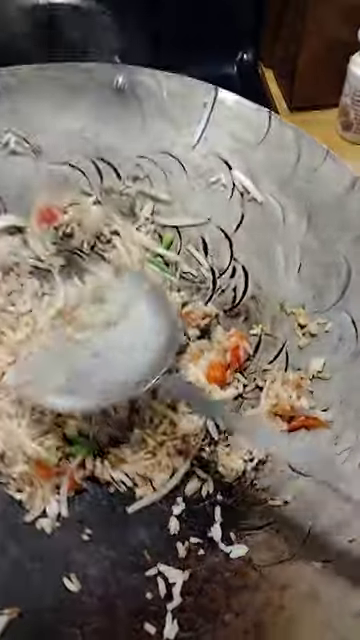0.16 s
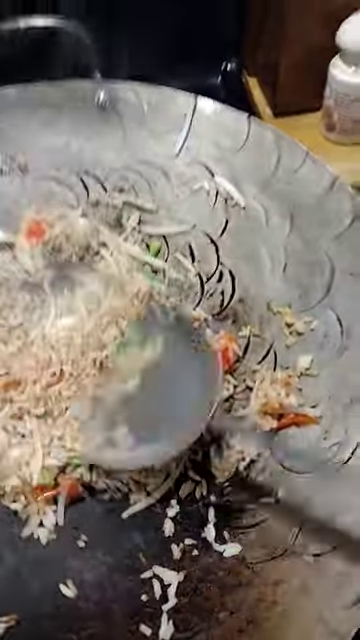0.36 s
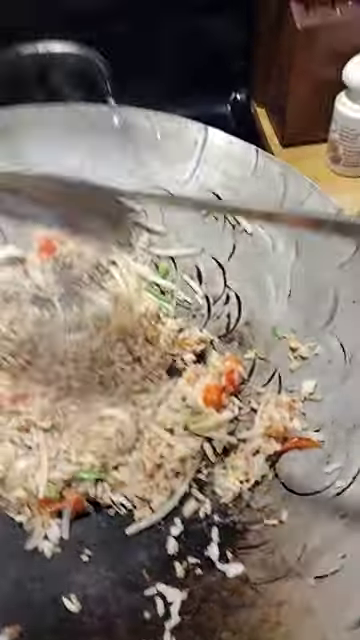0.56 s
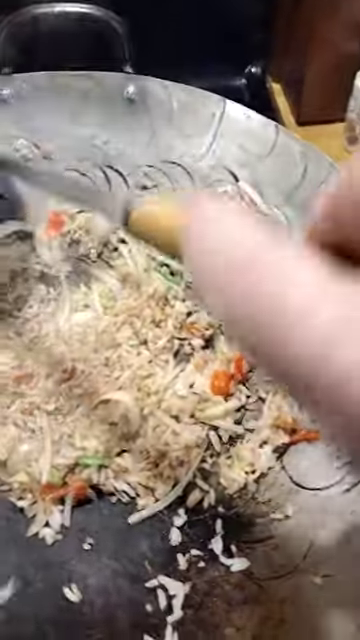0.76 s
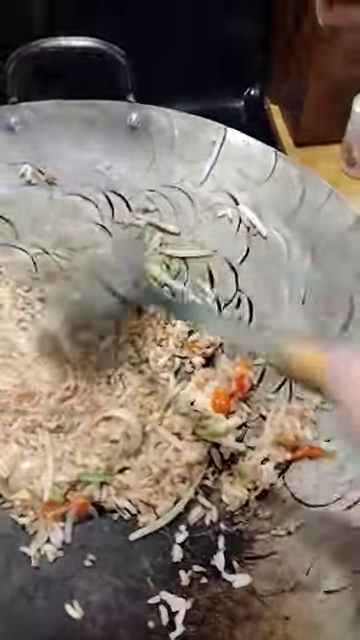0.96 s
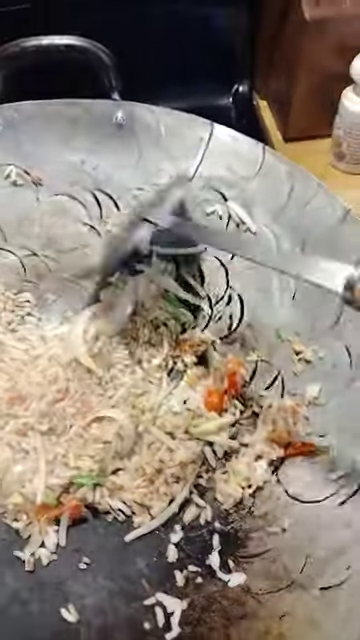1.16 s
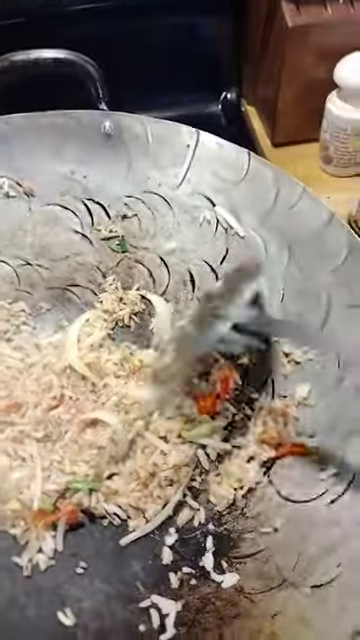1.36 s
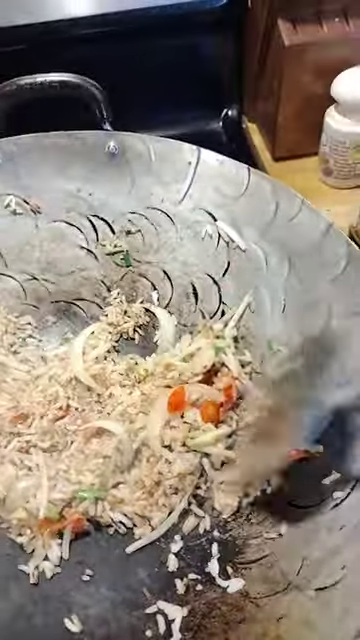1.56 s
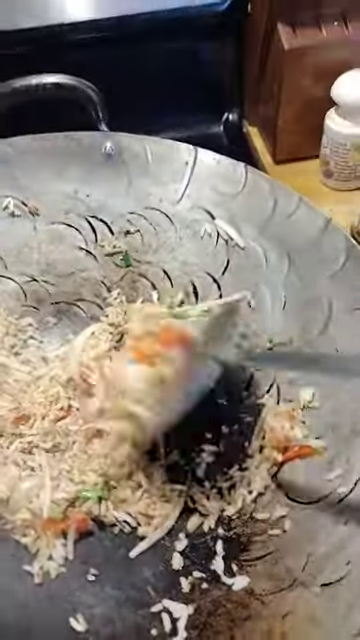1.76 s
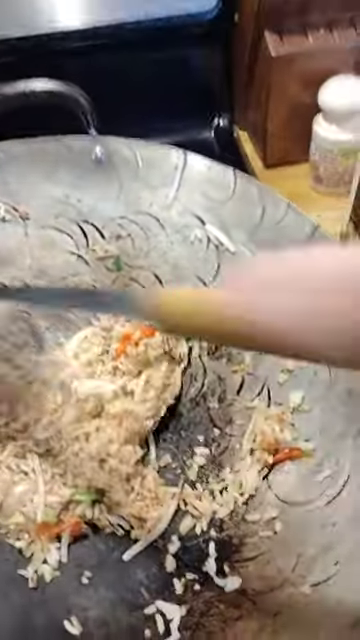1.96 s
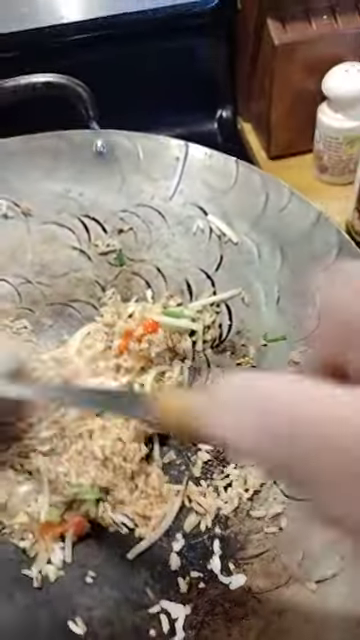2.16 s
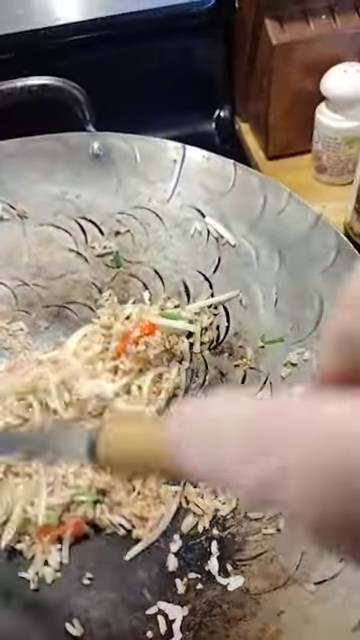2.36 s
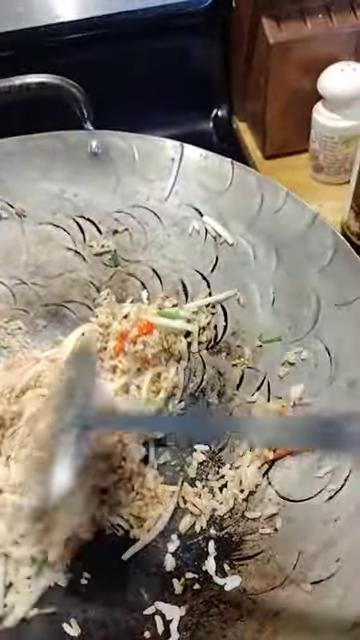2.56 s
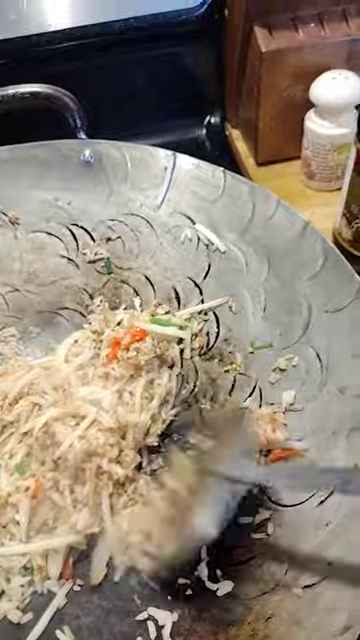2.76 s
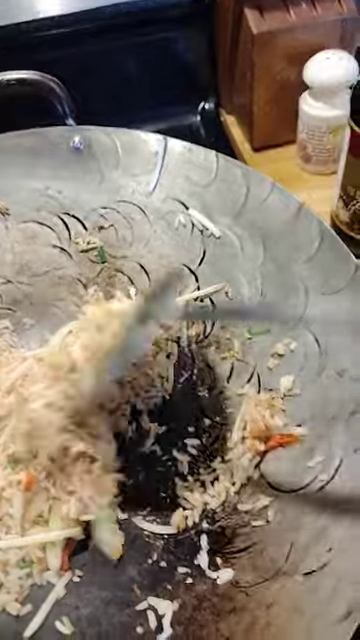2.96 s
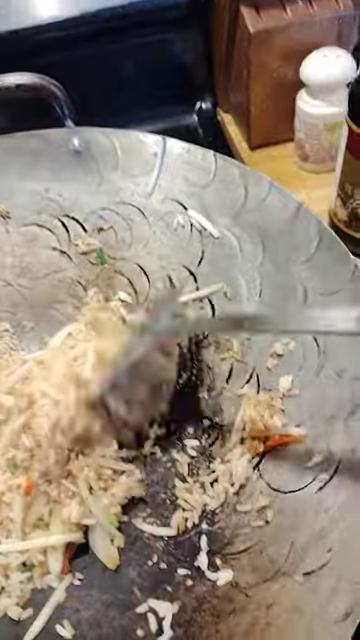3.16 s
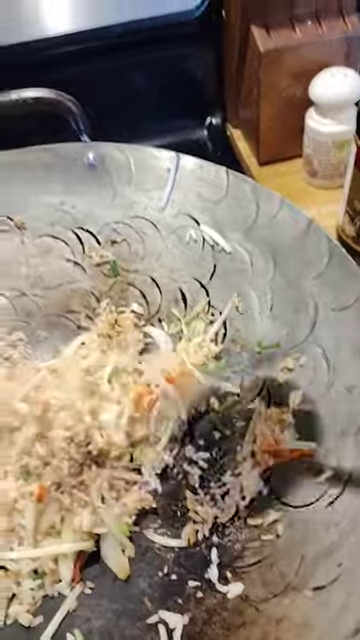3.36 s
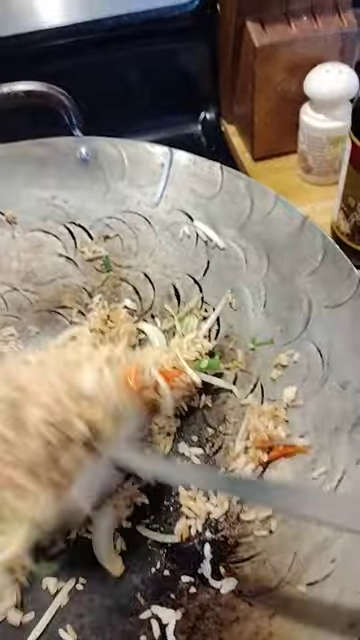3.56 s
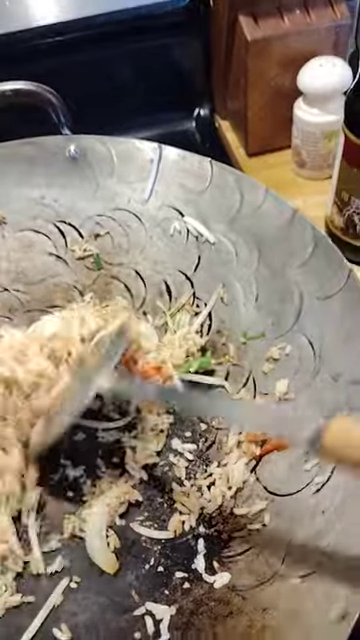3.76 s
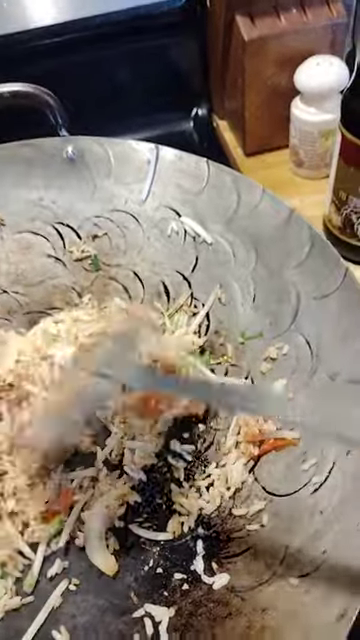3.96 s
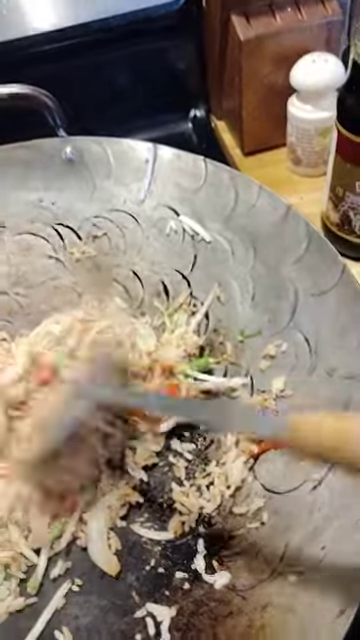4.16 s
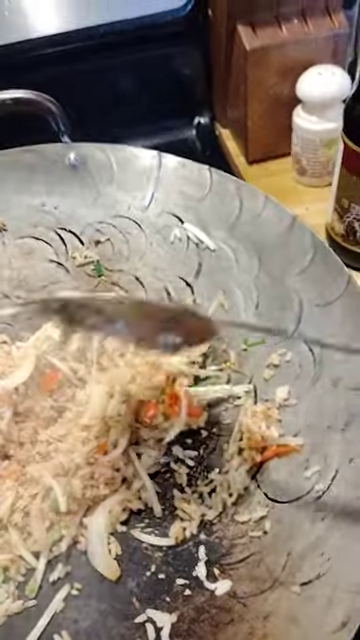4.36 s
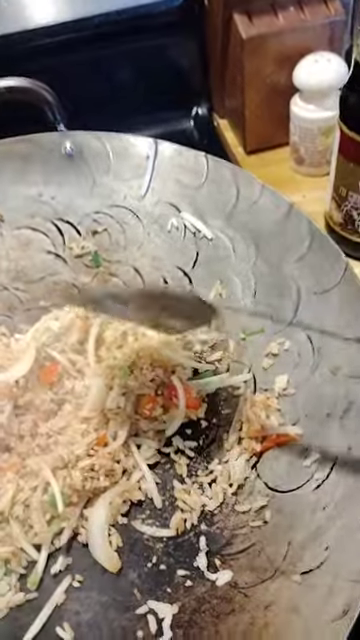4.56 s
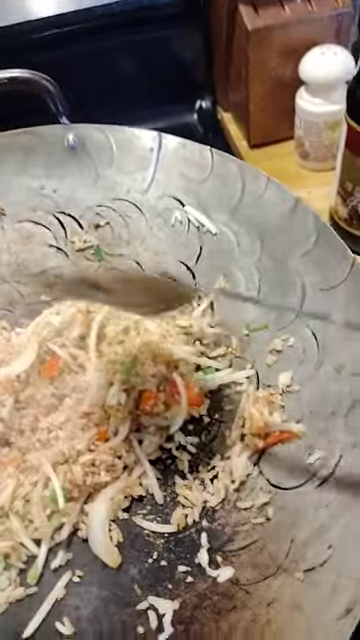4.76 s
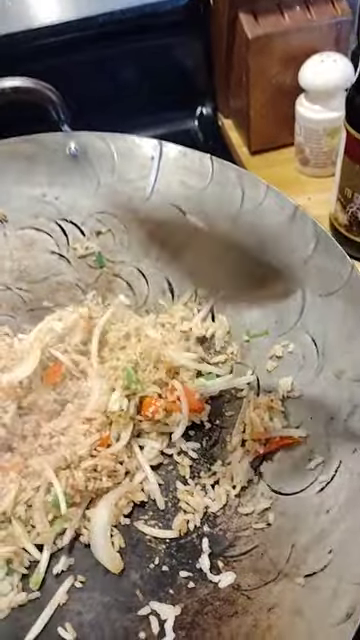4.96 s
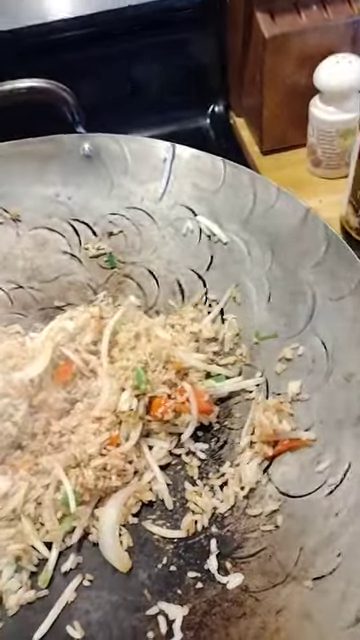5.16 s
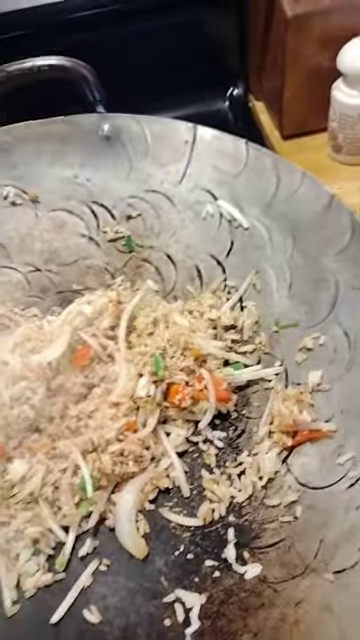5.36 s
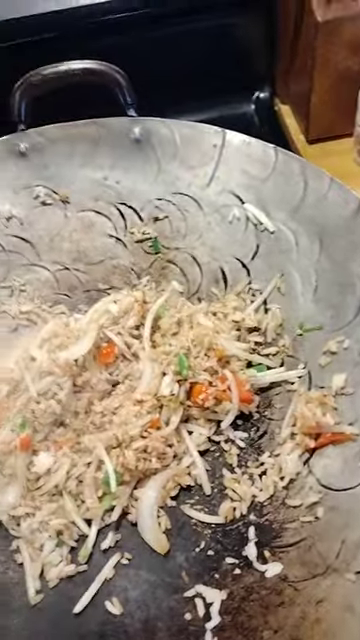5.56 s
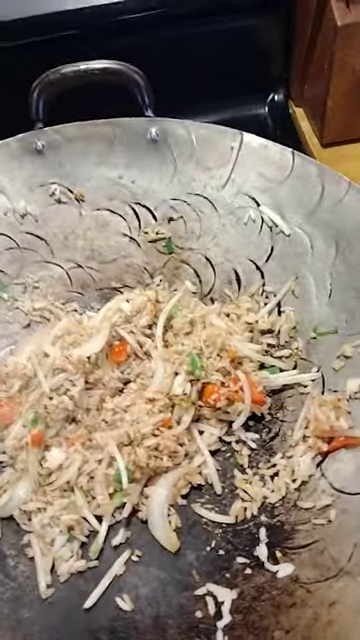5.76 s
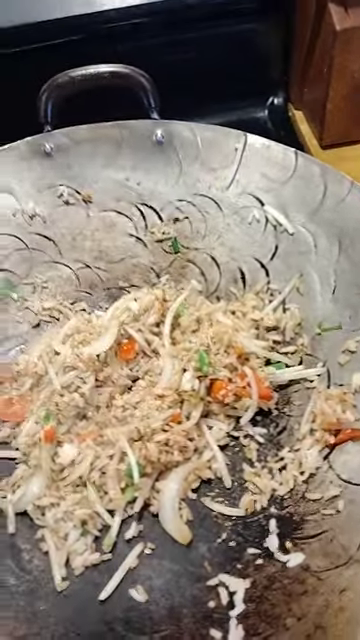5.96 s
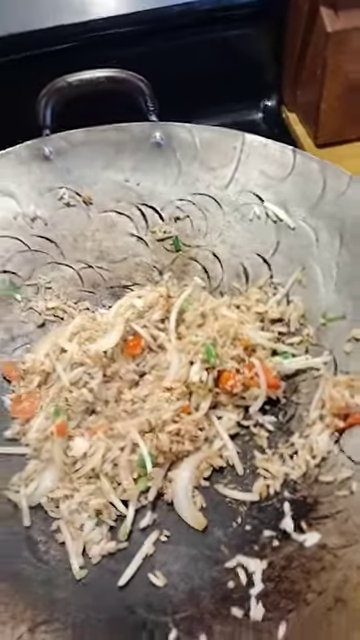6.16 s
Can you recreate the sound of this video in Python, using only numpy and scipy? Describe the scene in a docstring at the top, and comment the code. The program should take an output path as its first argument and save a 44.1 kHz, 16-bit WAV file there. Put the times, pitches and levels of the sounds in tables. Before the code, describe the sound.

Rice and vegetables crackle and sizzle in a steel wok while a metal spatula scrapes, clanks and rings, then a utensil clatters dully.

```python
"""A kitchen heard from close by, through a stereo microphone pair over a steel wok.
From the start rice and vegetables fry as crackling noise over the stove's low roar and wavering hum.
Soon a metal spatula scrapes (stick-slip noise through ringing modes), fat spits in short noise bursts,
and the spatula strikes the pan (pressure pulse, thud, ringing blade); turned rice flares up on hot steel.
The spatula is tapped off, the sizzle dies down, and near the end a utensil clatters dully on the worktop."""
import sys
import numpy as np
from scipy import signal
from scipy.fft import rfft, irfft, next_fast_len
from scipy.io import wavfile
from scipy.ndimage import uniform_filter1d

SR = 44100
rng = np.random.default_rng(int(sys.argv[2]) if len(sys.argv) > 2 else 0)


def unload_audio(sound):
    """Save the sound as a 16-bit wav file, at the path given as the first command line argument."""
    columns = np.transpose(np.atleast_2d(sound))
    # keep every value between -1 and 1, then stretch to whole-number steps
    steps = np.round(np.clip(columns, -1, 1) * 32767)
    wavfile.write(sys.argv[1], SR, steps.astype(np.int16))


N = 277827
TIME = np.arange(N) / SR  # s

# All table levels are relative: each source trims them further.
# Noise spectra of the frying food: (frequency [Hz], density [dB per Hz])
SIZZLE_SPECTRUM = [(30, -61), (300, -37), (700, -7.5), (1500, -18), (2100, 2.5), (3200, -1.5), (5000, 1.5),
                   (8000, 0), (12000, -3), (15500, -1.5)]
RUSTLE_SPECTRUM = [(30, -46), (250, -30.5), (500, -24.5), (900, -16.5), (1600, -10), (1900, -1), (2200, 1),
                   (2700, -5.5), (4000, -3), (6000, -18.5), (12000, -19)]
FIZZ_SPECTRUM = [(500, -46), (3000, -20), (7000, -4.5), (11000, 0.5), (15500, -1.5)]
# Noise spectra of the stove, wok, spatula blade and worktop: (frequency [Hz], density [dB per Hz])
STOVE_SPECTRUM = [(20, -57), (45, -25), (70, -7), (97, -7.5), (128, -6), (165, -5.5), (245, 1.5),
                  (330, -4.5), (450, -8), (700, -19), (1500, -19.5), (4000, -40), (12000, -34.5)]
WOK_SPECTRUM = [(40, -71), (100, -26), (200, -11), (400, -3), (900, 1), (1550, -10.5), (2200, 3),
                (2800, -30), (5000, -21), (12000, -26)]
BLADE_SPECTRUM = [(50, -88), (1000, -29), (3100, -12), (3550, 8.5), (4200, 1), (4900, -7.5), (6300, -3),
                  (8000, -10.5), (15500, -16.5)]
WORKTOP_SPECTRUM = [(30, -13), (130, -2), (330, -6), (450, 7.5), (750, 5.5), (1100, 6.5), (1500, -4),
                    (2300, -3.5), (3300, -19), (6000, -32), (15000, -44)]
# Likeness of the two microphone channels, held to 1 at most: (frequency [Hz], likeness [1 = identical])
CHANNEL_LIKENESS = [(60, 0.6), (290, 1.02), (640, 0.34), (1400, 0.48), (3100, 0.02), (6800, 0), (15000, 0)]
# Lean of the frying across the pair: (frequency [Hz], left minus right [dB])
FRY_LEAN = [(200, 21), (700, -8), (1300, -7), (2400, 7.5), (4400, -3.5), (8000, -5), (15000, -6.5)]
# Modes of the wok and of the spatula blade, before pitch and hold factors:
# (frequency [Hz], level [dB], 60 dB decay [s])
WOK_MODES = [(260, -15, 0.049), (441.4, 1.5, 0.12), (563, 1, 0.088), (643, 1, 0.1), (817, -3, 0.18),
             (928, 1, 0.086), (915, -2, 0.16), (1102, -11, 0.16), (1290, 2, 0.1), (1444, 3.5, 0.058),
             (1804, -2.5, 0.087), (1790, 9.5, 0.056), (2074, -16, 0.12), (2270, 7, 0.059)]
BLADE_MODES = [(2940, -10.5, 0.65), (3630, -2, 0.75), (3820, -4, 0.36), (3590, -5, 0.12),
               (3940, -0.5, 0.084), (4010, 5.5, 0.19), (4020, -22, .2), (4370, -16, 0.17),
               (4410, -7.5, 0.83), (5100, -1, 0.25), (5600, -1, 0.34), (6670, -5, .28), (6740, -23, 0.17),
               (6900, -20, 0.47), (7800, -22, 0.33), (9100, -12, 0.14)]
# Modes of the worktop, the utensil on it, a hollow thump and a small clink:
# (frequency [Hz], level [dB], 60 dB decay [s])
WORKTOP_MODES = [(146.5, -3, 0.2), (281, 0.5, 0.098), (433.3, 1, 0.2), (561, 4, 0.11), (750, -12, 0.067),
                 (950, -5, 0.039), (1100, -1.5, 0.061)]
UTENSIL_MODES = [(1120, -7, 0.015), (1490, -3, 0.018), (1674, -4.5, 0.037), (2180, 2.5, 0.014),
                 (3065, -13, 0.048)]
THUMP_MODES = [(158, -1, 0.18), (294, 1, 0.09), (470, -9, 0.064)]
CLINK_MODES = [(508, -4, 0.12), (745, 0, 0.078), (1750, -7, 0.062), (3040, -1, 0.05)]
# Rice turned onto hot steel: (peak time [s], rise [s], time to halve before the slow decay [s],
# sizzle level [dB], rustle level [dB])
RICE_TURNS = [(0.102, 0.041, 0.065, -16.5, -17.5), (.352, .018, 0.033, -23, -19.5),
              (.66, 0.034, 0.35, -33, -41.5), (.8, 0.036, 0.11, -36, -36.5),
              (1.061, 0.043, 0.056, -18, -26), (1.384, 0.024, 0.064, -21, -28),
              (1.77, 0.067, 0.58, -29, -40), (2.275, 0.045, 0.084, -22.5, -29.5), (2.6, 0.15, .4, -30, -35),
              (3.03, 0.25, 0.27, -32, -40.5), (3.32, 0.029, 0.062, -29, -37.5),
              (3.621, 0.013, 0.68, -23, -30.5), (3.92, 0.059, 0.43, -21, -27),
              (4.22, 0.034, 0.099, -20, -23.5), (5.09, 0.035, 0.12, -36, -39),
              (6.24, 0.022, 0.024, -58, -45.5)]
# Stove over time: (time [s], roar level [dB], hum level [dB])
STOVE_LEVELS = [(0, -45, -49.5), (2, -42.5, -49.5), (4.4, -45, -54.5), (4.9, -40, -39.5), (5.1, -36.5, -34),
                (5.4, -44, -41), (5.9, -40, -42), (6.3, -40.5, -44)]
# Blade scraping steel, and at 1.87 s a slow swell as the wok rings out: # (time of hardest press [s], rise [s],
# fall [s], blade level [dB], wok level [dB], blade pitch [factor])
SCRAPE_EVENTS = [(.092, 0.037, 0.024, -38, -42, 1.1), (.36, 0.024, 0.051, -33, -47, 1.5),
                 (.988, 0.019, 0.024, -26.5, -26, 0.89), (1.335, 0.05, 0.017, -25, -32, .98),
                 (1.383, 0.023, 0.033, -15.5, -27, 1.02), (1.722, 0.02, 0.037, -24, -29.5, .96),
                 (1.87, 0.19, 0.095, -40, -43, 1.14), (2.214, 0.015, 0.028, -23, -49, 1.08),
                 (2.51, 0.017, 0.035, -21.5, -58, 1.07), (2.84, 0.016, 0.047, -27.5, -39.5, 0.96),
                 (4.21, 0.027, 0.079, -30.5, -42.5, 1.13)]
# Loudest spits of fat: (time [s], level [dB])
LOUD_SPITS = [(.197, -16), (.333, -3), (.7962, -12), (1.9949, -22), (2.0093, -10), (2.5934, -5.5),
              (3.4164, -11), (3.5488, -13), (4.0064, -8), (4.1524, -14), (5.028, -10.5), (5.2712, -12),
              (5.537, -19), (5.691, -14), (6.2222, -21)]
# Spatula blows: (time [s], wok thud [dB], contact pulse [Hz, low when cushioned], blade ring [dB],
# blade tilt [dB per octave], hold [factor on ring time, small when buried in rice],
# blade pitch [factor, pressing stiffens it])
BLOW_EVENTS = [(0.332, -28, 2090, -40, -1, 0.37, 1), (.926, -12, 900, -12, -9, 0.39, 1.055),
               (0.988, -17, 1310, -18, -6, 0.52, 1.12), (1.272, -14.5, 1400, -13.5, 1.5, 0.42, 1.08),
               (1.621, -17, 1900, -12, 0.5, 0.35, 1.066), (2.142, -13.5, 500, -24, -5, 0.25, 1.08),
               (2.147, -22.5, 875, -17.5, -11.5, 0.44, 1.05), (2.473, -17, 1070, -11, 0.5, 0.25, 1.1),
               (3.192, -17, 2090, -12.5, 2, 0.39, 1.04), (4.512, -20, 780, -13, 0.5, 0.59, 1.026),
               (4.667, -19, 910, -11.5, 1.5, 0.73, 1.037), (4.695, -27, 770, -33, 0, 0.76, 0.75),
               (4.881, -17, 850, -12, 0, 0.7, 1.014)]
# Dull clatter: (time [s], worktop level [dB], utensil level [dB], 60 dB decay of the rattle [s],
# worktop tilt [dB per octave])
KNOCK_EVENTS = [(5.756, -26.5, -15.5, 0.024, 1), (5.8, -30.5, -18, 0.013, -3),
                (5.826, -30, -23.5, 0.028, -6), (5.933, -20.5, -27, 0.12, 1), (5.947, -32, -29, 0.33, 4),
                (5.977, -19, -33, 0.084, 5.5), (5.992, -21.5, -21, 0.15, 5.5), (6.012, -16.5, -29, 0.13, 2),
                (6.035, -23, -34, 0.17, -1.5), (6.071, -25, -49, 0.21, -0.5),
                (6.098, -32.5, -37, 0.081, 2.5)]

DRY_S, SETTLE_S = 0.86, 0.37  # time constants: water boiling off, grains coming to rest
SIMMER_DB, SIMMER_RUSTLE_DB = -38, -45.5  # rice lying still
REST_S, COOL_DB_PER_S = 4.17, 10  # the simmer fades from here on
HUM_HZ = 118.4
# The blade skids after each blow: levels are relative to that blow, the fall is at hold 1
SKID_DELAY_S, SKID_RISE_S, SKID_FALL_S = 0.037, 0.05, 0.22
SKID_BLADE_DB, SKID_WOK_DB = -21, -7
SMALL_SPITS_PER_S, SMALL_SPIT_DB, SMALL_SPIT_SPREAD_DB = 12, -29, 3
THUMP_S, THUMP_DB = 5.764, -21
CLINK_S, CLINK_DB = 5.829, -22
# The recorder's gain control: share of the excess taken off, and fall of its level detector
DUCK_FROM_DB, DUCK_SHARE, DUCK_ATTACK_S, DETECTOR_FALL_DB_PER_S = -16, 0.34, 0.043, 56
EDGE_HZ = 15750  # upper band limit


def amp(db):
    """Decibels to linear gain."""
    return 10 ** (np.asarray(db) / 20)


def unit(x):
    """Scales a signal to unit RMS."""
    return x / np.sqrt(np.mean(x ** 2) + 1e-20)


def read(points, hz):
    """Reads a frequency table, joined on a log-frequency axis."""
    f, value = np.transpose(points)
    return np.interp(np.log(hz + 1), np.log(f), value)


def level(table, column):
    """One dB column of a time table as a gain for every sample."""
    rows = np.array(table)
    return amp(np.interp(TIME, rows[:, 0], rows[:, column]))


def add(mix, s, sound):
    """Lays a sound into the mix from a time in seconds."""
    part = mix[:, max(round(s * SR), 0):][:, :sound.shape[1]]
    part += sound[:, :part.shape[1]]


def colour(x, spectrum, tilt_db=0, pivot_hz=4000, size=2048):
    """Causal minimum-phase filter of unit energy, tilted in dB per octave about a pivot."""
    hz = abs(np.fft.fftfreq(size, 1 / SR))
    octaves = np.log2(np.maximum(hz, 100) / pivot_hz)
    gain = amp(read(spectrum, hz) + tilt_db * octaves)
    minimum_phase = np.exp(signal.hilbert(np.log(gain)).conj())
    taps = np.fft.ifft(minimum_phase).real
    return signal.oaconvolve(x, taps[None] / np.linalg.norm(taps), axes=1)[:, :x.shape[1]]


def channel_angle(hz):
    """Angle whose cosine is the likeness of the two channels."""
    return np.arccos(np.clip(read(CHANNEL_LIKENESS, hz), -1, 1))


def microphone_pair(x, lean_table=((100, 0), (10000, 0))):
    """Mixes two unrelated signals as the pair hears them: alike in the bass, apart in the treble."""
    size = next_fast_len(x.shape[1])
    hz = np.fft.rfftfreq(size, 1 / SR)
    shared, apart = rfft(x, size)
    angle = channel_angle(hz) / 2
    lean = amp(read(lean_table, hz) / 2)
    left = (shared * np.cos(angle) + apart * np.sin(angle)) * lean
    right = (shared * np.cos(angle) - apart * np.sin(angle)) / lean
    return irfft(np.array([left, right]), size)[:, :x.shape[1]]


def noise(size):
    """Two channels of unrelated white noise."""
    return rng.standard_normal((2, size))


def wander(size, per_s):
    """Random values joined by straight lines, at a given rate."""
    knots = np.arange(size) * per_s / SR
    return np.interp(knots, np.arange(8000), rng.standard_normal(8000))


def crackle(size, per_s, spread_db, burst_s):
    """Tiny decaying noise bursts at random moments and sizes, brought to unit RMS."""
    happens = rng.random(size) < per_s / SR
    sizes = amp(spread_db * np.minimum(rng.exponential(1, size), 5)) * happens
    # dividing by the rate keeps the power steady while the bursts thicken
    power = signal.lfilter([1], [1, -np.exp(-1 / (burst_s * SR))], sizes ** 2 / per_s)
    return unit(np.sqrt(power) * noise(size))


def ring(modes, t, hold=1, tilt_db=0):
    """Dying sine modes; each contact point and each channel weighs them differently."""
    hz, db, t60 = np.transpose(modes)[:, :, None]
    chance_db = 2 * rng.standard_normal((2, len(hz), 1))
    weight = amp(db + tilt_db * np.log2(hz / hz.mean()) + chance_db)
    phase = rng.uniform(0, 2 * np.pi, hz.shape)
    phase = phase + channel_angle(hz) * rng.standard_normal(weight.shape)
    decay = amp(-60 * t / (t60 * hold))
    waves = weight * decay * np.sin(2 * np.pi * hz * t + phase)
    return waves.sum(1) / np.sqrt(np.sum(weight ** 2) / 4)


def stiffened(table, factor):
    """The same modes or spectrum with every frequency multiplied by a factor."""
    return [(hz * factor, *rest) for hz, *rest in table]


def shake(force, modes, hold=1, tilt_db=0):
    """Passes a force through a body's modes, keeping the force's strength."""
    response = ring(modes, np.arange(force.shape[1]) / SR, hold, tilt_db)
    shaken = signal.fftconvolve(force[:1], response, axes=1)[:, :force.shape[1]]
    return unit(shaken) * force.std()


def reflect(x, t60, wet_db, delay_s):
    """Adds a diffuse, decaying noise tail of reflections after a delay."""
    t = np.arange(SR // 2) / SR
    decaying = noise(len(t)) * amp(-60 * t / t60) * (t > delay_s)
    tail = microphone_pair(colour(decaying, [(200, 2.5), (4000, -2.0), (15000, -3.5)]))
    wet = signal.fftconvolve(x, tail / np.linalg.norm(tail[0]), axes=1)[:, :N]
    return x + amp(wet_db) * wet


def flare(s, rise, halve, end):
    """Swells to its peak, drops quickly, then lingers and dies away."""
    before = np.minimum(TIME - s, 0)
    after = np.maximum(TIME - s, 0)
    return np.exp(-(before / rise) ** 2 / 2 - after / end) / (1 + after / halve)


def stirring():
    """Strength of sizzle and rustle: a fading simmer plus the power of a flare for every turn of the rice."""
    cooling = amp(-COOL_DB_PER_S * np.maximum(TIME - REST_S, 0))
    heat_power = (amp(SIMMER_DB) * cooling) ** 2
    motion_power = (amp(SIMMER_RUSTLE_DB) * cooling) ** 2
    for s, rise, halve, sizzle_db, rustle_db in RICE_TURNS:
        heat_power = heat_power + (amp(sizzle_db) * flare(s, rise, halve, DRY_S)) ** 2
        motion_power = motion_power + (amp(rustle_db) * flare(s, rise, halve, SETTLE_S)) ** 2
    return np.sqrt(heat_power), np.sqrt(motion_power)


def frying():
    """Steam bubbles burst over a fine hiss, thicker as the sizzle grows; moving rice adds a lower rustle."""
    heat, motion = stirring()
    bubbles = crackle(N, per_s=2600 * heat / amp(-32), spread_db=2.5, burst_s=0.00042)
    steam = unit(bubbles + noise(N)) * amp(1.34 * wander(N, per_s=50))
    sizzle = unit(microphone_pair(colour(steam, SIZZLE_SPECTRUM), FRY_LEAN)) * heat * amp(3.8)
    grains = crackle(N, per_s=900 * motion / amp(-35.5), spread_db=3.0, burst_s=0.00053)
    grains = grains + amp(-3) * noise(N)
    rustle = unit(microphone_pair(colour(grains, RUSTLE_SPECTRUM), FRY_LEAN)) * motion * amp(2.5)
    droplets = crackle(N, per_s=170 * heat / amp(-29), spread_db=3, burst_s=0.0001)
    fizz = unit(microphone_pair(colour(droplets, FIZZ_SPECTRUM), FRY_LEAN)) * heat * amp(-7)
    # echoes inside the bowl
    return fizz + reflect(sizzle + rustle, t60=0.023, wet_db=-6, delay_s=0.000845)


def stove():
    """The burner's low roar is coloured noise; its fuzzy hum is a tone wavering in level and phase."""
    roar = unit(microphone_pair(colour(noise(N), STOVE_SPECTRUM, size=8192)))
    complex_noise = [1, 1j] @ noise(N)
    drift = signal.lfilter([1], [1, -np.exp(-np.pi * 9 / SR)], complex_noise)  # about 9 Hz wide
    hum = unit((drift * np.exp(2j * np.pi * HUM_HZ * TIME)).real)
    band = signal.butter(1, [70, 190], "band", fs=SR, output="sos")
    hum = unit(signal.sosfilt(band, hum))
    return roar * level(STOVE_LEVELS, column=1) + hum * level(STOVE_LEVELS, column=2)


def skids():
    """A light scrape follows every blow; the freer the blade, the longer it lasts and the more it shakes the wok."""
    rows = []
    for s, thud_db, _, ring_db, _, hold, pitch in BLOW_EVENTS:
        freedom = hold ** 2
        wok_db = thud_db + SKID_WOK_DB + 20 * np.log10(freedom)
        rows.append((s + SKID_DELAY_S, SKID_RISE_S, SKID_FALL_S * freedom,
                     ring_db + SKID_BLADE_DB, wok_db, pitch))
    return rows


def scrapes():
    """The edge sticks and slips under uneven pressure, shaking the blade's damped modes and the wok."""
    out, t = np.zeros((2, N)), np.arange(-SR // 5, SR // 5) / SR
    for s, rise, fall, blade_db, wok_db, pitch in SCRAPE_EVENTS + skids():
        press = np.exp(-(t / np.where(t < 0, rise, fall)) ** 2)
        press = press * amp(1.3 * wander(len(t), per_s=250))
        slips = crackle(len(t), per_s=1100, spread_db=0.6, burst_s=0.0005)
        blade = amp(0.5) * shake(slips, stiffened(BLADE_MODES, pitch), hold=0.33, tilt_db=-7)
        blade += amp(2.0) * colour(slips, stiffened(BLADE_SPECTRUM, pitch), tilt_db=-1.5)
        wok = shake(slips, WOK_MODES, hold=0.42)
        add(out, s + t[0], press * (amp(blade_db) * blade + amp(wok_db) * wok))
    return out


def small_spits():
    """Faint pops at random moments, as rows of (time [s], level [dB])."""
    chance, size = rng.random(N), rng.standard_normal(N)
    at = chance < SMALL_SPITS_PER_S / SR
    return list(zip(TIME[at], SMALL_SPIT_DB + SMALL_SPIT_SPREAD_DB * size[at]))


def spits():
    """Single drops of fat burst with a sharp tick of noise and a short tail."""
    out, t = np.zeros((2, N)), np.arange(SR // 20) / SR
    for s, db in LOUD_SPITS + small_spits():
        burst = noise(len(t)) * (amp(-60 * t / 0.012) + amp(-9) * amp(-60 * t / 0.058))
        tick = colour(burst, SIZZLE_SPECTRUM, tilt_db=3.5) + amp(-3) * colour(burst, RUSTLE_SPECTRUM)
        add(out, s + 0.001008, amp(db - 10) * tick)
    return out


def blows():
    """The pan jerks with one short pressure pulse and thuds briefly while the blade rings on."""
    out, t = np.zeros((2, N)), np.arange(SR // 2) / SR
    for s, thud_db, pulse_hz, ring_db, tilt_db, hold, pitch in BLOW_EVENTS:
        u = 2 * np.pi * pulse_hz * (t - t.mean())
        jerk = amp(thud_db + 6) * (1 - u ** 2) * np.exp(-u ** 2 / 2)
        add(out, s + 0.00046 - t.mean(), jerk[None])
        hardness_db = 4 * np.log2(pulse_hz / 1000)  # a shorter contact reaches higher modes
        chatter = noise(len(t)) * (amp(-60 * t / 0.025) + amp(-17.0) * amp(-60 * t / 0.23))
        thud = amp(3.5) * microphone_pair(colour(chatter, WOK_SPECTRUM, hardness_db))
        thud += amp(-2.0) * ring(WOK_MODES, t, 0.96, hardness_db)
        buzz = noise(len(t)) * (amp(-60 * t / (0.41 * hold)) + amp(2.0) * amp(-60 * t / 0.044))
        blade = amp(-1.0) * colour(buzz, stiffened(BLADE_SPECTRUM, pitch), tilt_db)
        blade += amp(-4) * ring(stiffened(BLADE_MODES, pitch), t, hold, tilt_db)
        onset = 1 - np.exp(-t / 0.002)
        add(out, s - 0.0005, amp(thud_db) * thud + amp(ring_db) * blade * onset)
    return out * amp([[0.6], [-0.6]])  # slightly left


def clatter():
    """A utensil knocks on the worktop, which thumps hollowly; it clinks once and rattles to rest."""
    out, t = np.zeros((2, N)), np.arange(SR // 3) / SR
    for s, top_db, utensil_db, t60, tilt_db in KNOCK_EVENTS:
        rattle = crackle(len(t), per_s=1300, spread_db=-7.0, burst_s=0.0017) * amp(-60 * t / t60)
        rattle[0, 0] += 8  # the first contact
        top = amp(-1.0) * microphone_pair(colour(rattle, WORKTOP_SPECTRUM, tilt_db))
        top += amp(-2) * ring(WORKTOP_MODES, t, tilt_db=tilt_db)
        utensil = amp(-1.5) * shake(rattle, UTENSIL_MODES) + ring(UTENSIL_MODES, t)
        add(out, s, amp(top_db) * top + amp(utensil_db) * utensil)
    swell = 1 - np.exp(-t / 0.0018)
    add(out, THUMP_S, amp(THUMP_DB) * ring(THUMP_MODES, t) * swell)
    add(out, CLINK_S, amp(CLINK_DB) * ring(CLINK_MODES, t) * swell)
    return out


def scene():
    """Frying and stove close to the microphones; the separate strokes, spits and knocks also reach the walls."""
    background = frying() + stove()
    events = scrapes() + spits() + blows() + clatter()
    return background + reflect(events, t60=0.32, wet_db=-10.5, delay_s=0.012)  # kitchen walls


def record(dry):
    """Gain control dips the whole level after loud sounds; then soft overload and the band limit."""
    power = uniform_filter1d((dry ** 2).mean(0), size=220)
    power_db = 10 * np.log10(abs(power) + 1e-12)
    fall = TIME * DETECTOR_FALL_DB_PER_S
    held_db = np.maximum.accumulate(power_db + fall) - fall  # jumps to peaks, then falls steadily
    over_db = np.maximum(held_db - DUCK_FROM_DB, 0)
    lag = np.exp(-1 / (DUCK_ATTACK_S * SR))
    ducked = dry * amp(-DUCK_SHARE * signal.lfilter([1 - lag], [1, -lag], over_db))
    overloaded = 1.1 * np.tanh(ducked / 1.1)
    lowpass = signal.firwin(401, EDGE_HZ, window=("kaiser", 7), fs=SR)
    return signal.oaconvolve(overloaded, lowpass[None], "same")


dry = scene()
out = record(dry)
unload_audio(out)
```